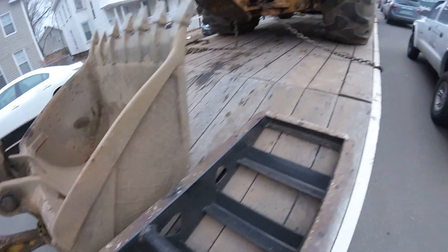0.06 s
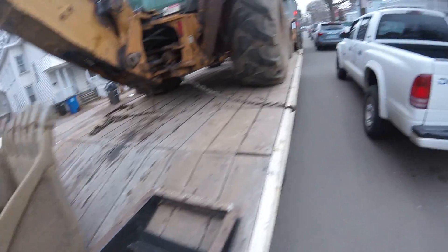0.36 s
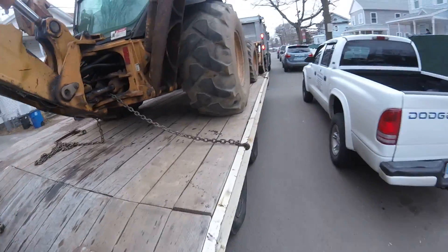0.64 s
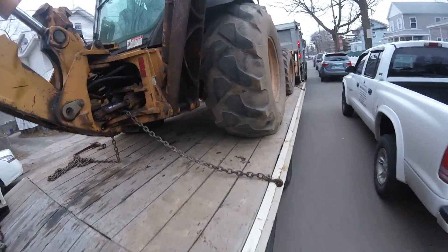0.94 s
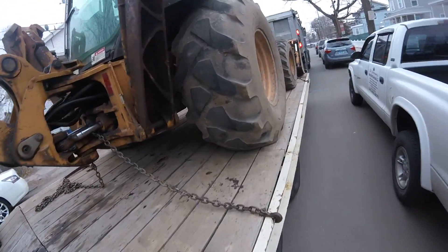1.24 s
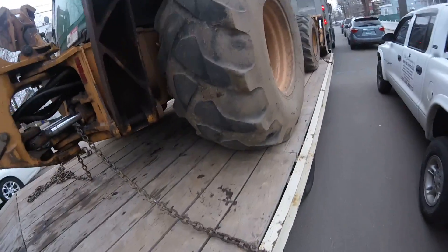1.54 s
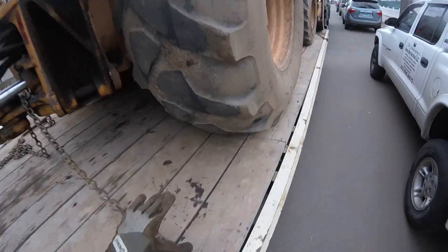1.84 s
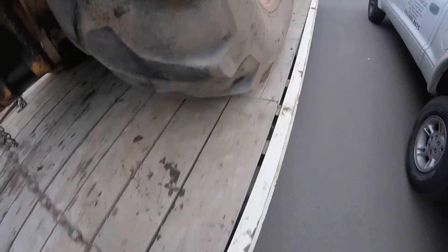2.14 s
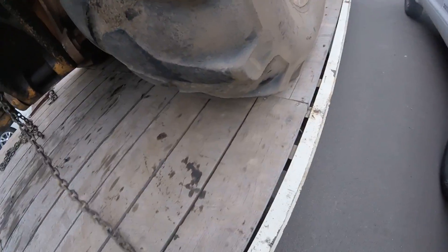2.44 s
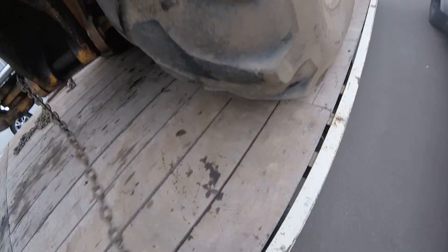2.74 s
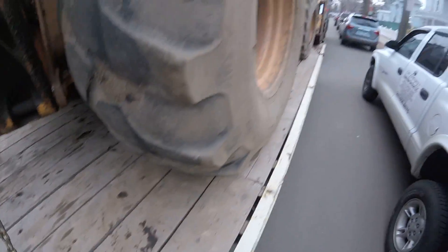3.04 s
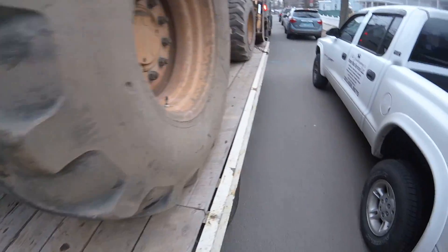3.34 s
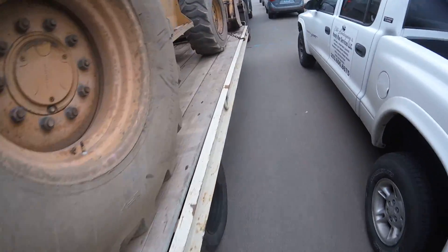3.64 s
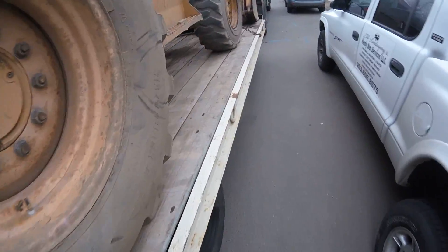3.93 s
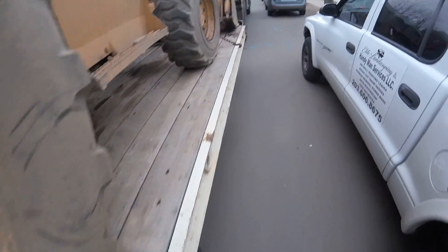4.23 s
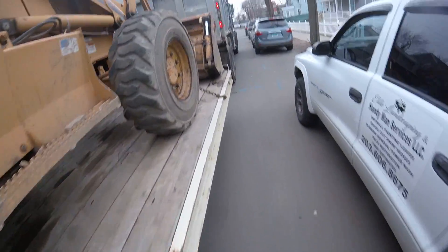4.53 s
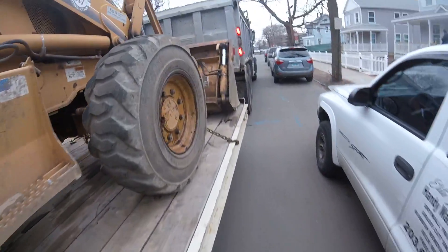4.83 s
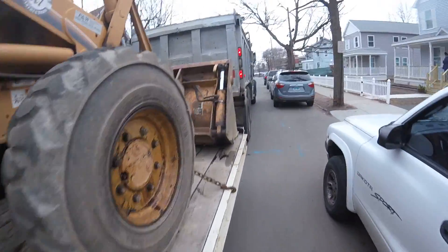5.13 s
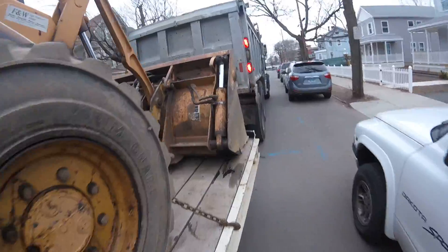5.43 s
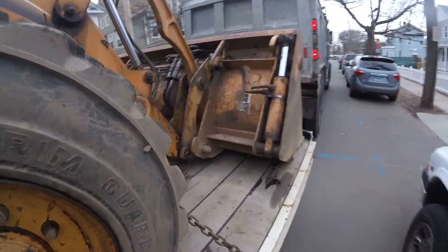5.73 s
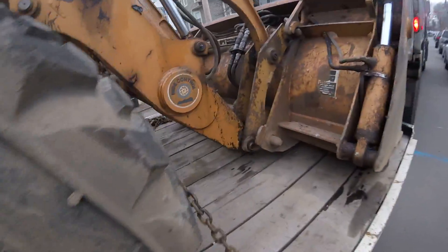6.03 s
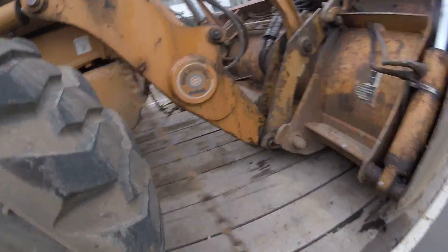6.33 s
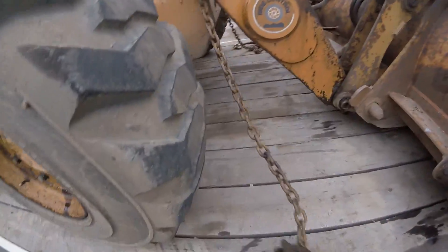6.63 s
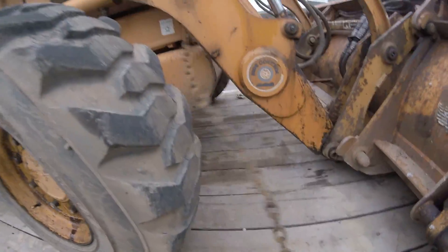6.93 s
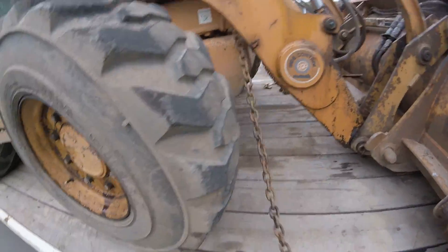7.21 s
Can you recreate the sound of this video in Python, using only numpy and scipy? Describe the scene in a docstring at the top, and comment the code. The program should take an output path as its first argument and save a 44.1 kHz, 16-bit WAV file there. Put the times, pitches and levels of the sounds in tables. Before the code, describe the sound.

A diesel truck idles under wind rumble and street wash as the microphone moves along a flatbed trailer. It opens with a bang and ringing steel, followed by dull wooden thumps, rattling chains and the clink of a chain binder. Midway the load drags loudly across the planks. The engine then throbs more strongly, a close loose fitting clacks more often, clothing swishes softly, and the chains grate and rattle over steel.

```python
"""On a street, walking beside a flatbed trailer with a chained-down loader, behind an idling diesel truck.
The load thumps and drags on the plank deck. Tie-down chains rattle, scrape and set the steel frame
ringing; a binder clinks. A loose fitting clacks close to the microphone. Clothing swishes over engine
throb, wind rumble and street wash. Loud blows duck the gain, and the rumble then swells back."""
import sys
import numpy as np
from scipy import signal
from scipy.fft import rfft, irfft, next_fast_len
from scipy.io import wavfile
from scipy.ndimage import minimum_filter1d

SR = 44100
rng = np.random.default_rng(int(sys.argv[2]) if len(sys.argv) > 2 else 0)


def to_wav(s):
    """Save 16-bit WAV."""
    ch = np.atleast_2d(s).T  # columns
    pcm = np.round(np.clip(ch, -1, 1) * 32767)  # PCM
    wavfile.write(sys.argv[1], SR, pcm.astype(np.int16))


N = 325017

# load hitting the deck: start_s, low_db, mid_db, shudder_db, knock_hz, boom_db
DECK_THUMPS = [(0.095, 7, -3, -5.5, 650, -45), (0.0968, -4, -1.5, -16, 1040, -45),
               (0.117, 17, 8, -20.5, 737, -45), (0.119, -11, -5, -14, 1120, -50),
               (2.095, -13, -16, -12, 985, -39), (2.108, -0.5, 3.5, -4, 945, -24),
               (2.155, -14, -9, -8, 870, -35), (2.561, 1, -4.5, -8, 1090, -38),
               (2.572, 3.5, 4.5, -8, 954, -14.5), (2.66, -17, -14.5, 2, 900, -46),
               (2.751, -9, -7.5, -3, 670, -49), (3.947, -24.5, -14, 2, 1140, -39),
               (3.9688, -7, -3.5, 1, 1230, -35), (3.9899, -2, 7.5, -1.5, 1108, -16),
               (4.0171, 4, 8.5, -6, 1098, -19), (4.044, -0.5, 2, 1, 1350, -22),
               (4.059, -13, -1, -5, 1000, -15), (4.078, 1, 4, -8, 1113, -15.5),
               (4.093, -20, -2, 0.5, 1100, -14), (4.106, 5.5, 4.5, -8, 870, -23),
               (6.18, -3.5, -22, -24, 986, -29), (6.7597, -21, -20, 4, 850, -53),
               (6.8923, -27, -12, -1, 984, -42), (6.8995, -25, -9.5, -9, 696, -35),
               (6.929, -5, -12, -6.5, 490, -27.5), (7.003, -28, -19, -10, 865, -49),
               (7.015, -16, -32, -8, 770, -55)]
# load dragging over the deck: start_s, length_s, peak_db, bass_offset_db
DECK_DRAGS = [(3.975, .165, -2, -7), (6.118, 0.09, -34, 10), (6.328, .2, -26, 6), (6.849, 0.18, -28, 6)]
# plank modes: pitch_hz, level_db, t60_s
DECK_MODES = [(258, -20, 0.076), (300.3, -12, 0.076), (620, -12.5, 0.016), (835, -9, 0.06),
              (1090, -25, 0.018), (1347, -10.5, 0.059)]
# shudder of planks and load: freq_hz, density_db
SHUDDER_SPECTRUM = [(170, -16), (270, -4), (400, -1), (700, -2.5), (1100, -0.5), (1400, -11), (1900, -25.5),
                    (3000, -32), (6000, -41.5)]
# whole deck giving under a blow: freq_hz, density_db
BOOM_SPECTRUM = [(85, -19), (125, 6), (165, -0.5), (205, -8), (280, -8)]

# fitting contacts: start_s, body_db, low_ping_db, mid_ping_db, high_ping_db, body_hz
FITTING_CLACKS = [(1.0213, 3, -24, -8, -19, 1860), (1.0243, -10.5, -25, -25, -34, 1670),
                  (1.0406, -14, -42, -48, -53, 1550), (1.516, -11, -20, -30, -37, 1890),
                  (1.522, -22, -29, -43, -56, 1650), (1.5423, -18, -43, -54, -54, 1450),
                  (1.5586, -20, -16, -26, -35, 1750), (1.5615, -15, -32, -36, -48, 1470),
                  (2.002, -21, -50, -56, -55, 1500), (2.1482, -24, -13, -16, -30, 1860),
                  (2.1772, -17, -11, -12, -11, 1630), (2.1862, -10, -34, -17, -34, 1890),
                  (2.2013, -10, -30, -21, -31, 1790), (2.2098, -24, -22, -20, -29, 2010),
                  (2.241, 5.5, 0, 1.5, -5.5, 1940), (2.25, 9.5, -15, -8.5, -14, 1570),
                  (3.2136, -16, -5, -16, -34, 1640), (3.2173, -6.5, -26, -26, -35, 1400),
                  (3.2205, -27, -28, -23, -31, 1726), (3.2255, -20, -24, -30, -31, 1440),
                  (3.2335, -11, -34, -45, -45, 1550), (3.262, -10.5, -37, -42, -52, 1630),
                  (3.2655, -14, -43, -32, -44, 1530), (3.2721, -13.5, -42, -48, -66, 1530),
                  (3.6294, -17, -9, -11, -18, 1840), (3.6334, -6, -32, -26, -33, 1394),
                  (3.6368, -13.5, -32, -28, -42, 1390), (4.6881, -16.5, -45.5, -54, -60, 1570),
                  (5.116, -27, -34, -25.5, -29, 2430), (5.1247, -13, -6, -35, -32, 1930),
                  (5.131, -6.5, -30, -37, -52, 1500), (5.1622, -9, -36, -18, -30, 1700),
                  (5.1676, 5, -27, -11, -25, 1680), (5.1717, -1.5, -17, -21, -40, 1640),
                  (5.4431, -27, -13, -13, -24, 1990), (5.446, -7.5, -39, -31, -42, 1420),
                  (5.6001, 4, -16, -15, -29, 1830), (5.6056, -3, -29, -20, -35, 1530),
                  (5.612, -5, -28, -24, -30, 1480), (5.6146, -10, -36, -34, -34, 1610),
                  (6.0825, -17, -4, -22, -34, 1750), (6.0863, -14, -15, -29, -46, 1580),
                  (6.1423, -25, -2, -11, -16, 1730), (6.145, -2.5, -26, -24, -43, 1490),
                  (6.149, -7, -23, -20, -24, 1790), (6.153, -20, -12, -23, -32, 1670),
                  (6.3726, -14, -35, -9.5, -21, 2250), (6.378, -8, -24, -9, -23, 1570),
                  (6.3816, -11, -28, -35, -35, 2050), (6.4072, -2, -22, -22, -23, 1560),
                  (6.4134, 0, -1, -9.5, -19, 2000), (6.4186, -5, -14, -24, -34, 1940),
                  (6.483, -9, -20, -16, -23, 1760), (6.488, -9, -21, -32, -32, 1450),
                  (6.4925, -2.5, -19, -17, -22, 1610), (6.538, -18, -0.5, -7, -17, 1640),
                  (6.5402, -3.5, -21, -20, -36, 1560), (6.5448, -22, -8, -13, -22, 1870),
                  (6.549, -8, -19, -21, -26, 1698), (7.2685, -22, -28, -32, -33.5, 1988)]
# fitting modes: pitch_hz, level_db, t60_s
FITTING_MODES = [(692, -23, 0.0053), (1272, -13.5, 0.014), (1536, -22.5, 0.077), (2140, -22.5, 0.073),
                 (2314, -0.5, 0.0053), (2510, -13.5, 0.014), (3480, -14, 0.0075), (4450, -2.5, 0.0058),
                 (5650, -5, 0.013), (6850, -0.5, 0.007), (7820, -7.5, 0.0041), (9210, 1, 0.0053),
                 (12300, -5, 0.0055), (13800, -15, .003)]
# crack and buzz of a contact: freq_hz, density_db
CRACK_SPECTRUM = [(2500, 4.5), (6000, -0.5), (10000, -5.5), (16000, -18.5)]
BUZZ_SPECTRUM = [(250, 18.5), (900, 8.5), (1500, 14), (2300, 6.5), (3200, -4), (7000, -15.5),
                 (14000, -43)]

# chain jerks: start_s, clank_db, jingle_db, ping_db
CHAIN_JERKS = [(0.001, -21.5, -29, -52), (0.118, -3.5, -17, -25), (0.148, -9, -14, -22),
               (0.34, -30, -56, -66), (2.099, -21, -40, -47), (2.111, -18.5, -31, -57.5),
               (2.658, -24.5, -44, -84), (2.734, -26.5, -45, -80), (2.752, -25.5, -38, -76),
               (3.937, -22, -56, -50), (3.9695, -19, -68, -56), (4.017, -14, -65, -40),
               (4.043, -21, -55, -33), (4.058, -24, -52, -25.5), (4.094, -13.5, -54, -36),
               (4.12, -27, -43, -41), (6.452, -21, -33, -52), (6.47, -17.5, -32, -41),
               (6.562, -28.5, -36, -48), (6.724, -34, -48, -32.5), (6.7336, -29.5, -46, -51),
               (6.759, -29, -36, -71), (6.853, -28.5, -42, -76), (6.892, -29.5, -40.5, -69),
               (6.925, -32.5, -42, -52), (6.982, -41, -45, -61), (7.063, -27, -21, -27.5),
               (7.0714, -21, -37, -50), (7.153, -38, -45, -52)]
# chain shake per thump, relative to its mid_db: clank_db, jingle_db, ping_db
THUMP_SHAKE_DB = (-32.5, -57.5, -67)
# link modes, and the thin ring of a single link: pitch_hz, level_db, t60_s
LINK_MODES = [(1625, -15.5, 0.1), (2562, -10, 0.06), (3530, -7, 0.05), (4300, -11.5, 0.031),
              (5390, -3, 0.033), (6940, -1, 0.035), (8240, -11.5, 0.025), (9340, -3, 0.04)]
LINK_PING_MODES = [(13700, -5.5, .19), (14600, -12, .11)]
# low, high and top bands of a rattle: freq_hz, density_db
CLANK_SPECTRUM = [(800, 18), (1500, 13.5), (2000, 3), (2750, -1.5), (3400, -3.5), (4300, -12),
                  (5500, -31.5), (8000, -29.5)]
JINGLE_SPECTRUM = [(3000, 9.5), (4500, 4.5), (5500, -2.5), (6100, 3), (6800, 8.5), (7800, -5), (9500, -2.5),
                   (12000, -25.5)]
PING_SPECTRUM = [(10500, -10.5), (12500, -12.5), (13400, 3), (14000, -5.5), (14700, -0.5), (15400, -12.5)]

# chain sliding over a steel edge: centre_s, half_width_s, grating_db, sizzle_db
CHAIN_SCRAPES = [(2.184, 0.052, -35, -44), (2.672, .012, -40, -54), (2.76, 0.019, -34, -51),
                 (3.98, 0.023, -27, -51), (4.117, .025, -34, -53), (6.37, 0.03, -43, -47),
                 (6.428, 0.016, -31, -55), (6.481, 0.041, -28.5, -40.5), (6.578, 0.036, -38, -44),
                 (6.74, 0.0075, -50, -42), (6.857, 0.011, -38, -42), (7.072, 0.009, -44, -50)]
# modes rung by snagging links: pitch_hz, gain_db, t60_s
GRATE_MODES = [(1130, -7.5, .012), (1440, 2, .014), (1630, 1, 0.014), (2000, -3, .01), (2420, -2, .009),
               (2950, -7, .008), (3500, -10, 0.0076), (4200, -14.5, .006)]
# sizzle of a scrape: freq_hz, density_db
SIZZLE_SPECTRUM = [(2500, 6), (4500, 8.5), (7000, 2), (10000, -7.5), (13000, -24.5)]

# binder hitting the deck: start_s, level_db
BINDER_HITS = [(2.658, -38), (2.751, -23), (7.066, -35)]
# binder modes: pitch_hz, level_db, t60_s
BINDER_MODES = [(2320, -17, 0.19), (2530, -4, 0.054), (2660, 3, 0.062), (2890, -2, 0.061),
                (3130, -3.5, 0.087), (3620, -5.5, 0.056), (5170, -14, .06), (5600, -15, 0.044),
                (6330, -11, 0.045)]

# blows reaching the frame: start_s, level_db
FRAME_HITS = [(.001, 14), (0.135, 19.5)]
# frame modes: pitch_hz, t60_s, first_hit_db, second_hit_db
FRAME_MODES = [(310, 0.8, -71, -40.5), (411, 4.2, -44.5, -66.5), (718, 0.49, -43, -43),
               (766, 0.26, -51, -29), (882, 0.26, -22.5, -30), (903, 1.6, -50, -44), (1280, 0.55, -48, -44),
               (1383, 0.45, -38, -34), (1413, 0.22, -36, -21), (1496, 0.56, -34.5, -39),
               (1526, 0.68, -36, -40), (1630, 0.53, -43, -46), (1980, 0.38, -50, -43),
               (2270, 0.7, -61, -49.5), (2560, 0.51, -57, -47), (2740, 0.33, -51, -50),
               (2820, 0.29, -51, -58), (3115, 0.46, -43.5, -43), (3181, 0.33, -41, -35),
               (3360, 0.69, -52, -52), (3440, 0.33, -48, -38.5), (3590, 0.32, -48, -40),
               (3800, 0.31, -48, -42), (4140, 0.4, -47, -55), (4850, 0.22, -52, -43),
               (5400, 0.21, -49, -43), (6650, 0.3, -59, -46), (6840, 0.24, -64, -37), (8550, .18, -60, -58),
               (9200, 0.34, -65, -54), (10550, 0.24, -76, -48)]
# crowd of weak frame modes: freq_hz, density_db
SHIMMER_SPECTRUM = [(250, 5), (800, -5), (1500, 4), (2100, -2), (3400, -2), (5000, -1.5), (7000, -5.5),
                    (11000, -21)]

# clothing swishes: centre_s, half_width_s, level_db
CLOTH_SWISHES = [(0.877, 0.03, -52), (1.368, 0.039, -50), (1.854, 0.018, -55.5), (3.495, 0.18, -58),
                 (4.545, 0.03, -47.5), (5.023, 0.038, -42), (5.445, 0.036, -47.5), (5.915, 0.025, -48.5)]
# cloth friction: freq_hz, density_db
CLOTH_SPECTRUM = [(1200, 3.5), (3300, 13.5), (4800, 4), (6000, 6), (8000, -2), (12000, -1.5), (15000, -25)]

# background as the truck draws nearer: time_s, firing_db, rumble_db, street_db
BACKGROUND_LEVELS = [(0.0, -27.5, -30.5, -40), (1.3, -29, -26.5, -40.5), (2.9, -27.5, -28.5, -43),
                     (3.7, -32, -24.5, -39), (4.5, -21, -23.5, -37.5), (5.8, -18, -24.5, -39),
                     (7.37, -20.5, -27.5, -35.5)]
# exhaust overtones: crank_multiple, level_db
EXHAUST_ORDERS = [(4, 6), (4.5, 0.5), (6, 2), (7, -9), (9, 2), (12, 1), (13, -5.5), (15.5, -8.5), (21, -13)]
# wind on the microphone: freq_hz, density_db
WIND_SPECTRUM = [(12, -10), (25, 3.5), (47, 3), (65, -3.5), (85, 3), (112, -6), (170, -13), (260, -15),
                 (500, -49.5)]
# engine and street wash: freq_hz, density_db
STREET_SPECTRUM = [(120, -9.5), (300, 2.5), (410, 3.5), (560, 0.5), (900, 4), (1300, -4.5), (1900, -20),
                   (2600, -23), (3700, -21), (4800, -35), (6500, -36.5), (10000, -42), (15000, -60.5)]


def deck(lowpass_hz=2800):
    """A dull knock, then planks and load shudder on, longest in the bass; wood swallows the treble."""
    blows = list(DECK_THUMPS) + drag_slips()
    start_s, low_db, mid_db, shudder_db, knock_hz, boom_db = np.transpose(blows)
    knock = ring(start_s, knock_hz, mid_db, t60_s=0.048, contact_s=0.00026)
    knock += strike(blows, [400, 950], DECK_MODES, contact_s=0.0016, scatter_db=-1.5, detune=0.088)
    tail = decay(start_s, low_db + shudder_db - 8, t60_s=0.46) * noise(SHUDDER_SPECTRUM, high_hz=790)
    tail += decay(start_s, mid_db + shudder_db - 9, t60_s=0.26) * noise(SHUDDER_SPECTRUM, low_hz=770)
    tail += decay(start_s, boom_db, t60_s=0.36) * noise(BOOM_SPECTRUM)
    return signal.sosfilt(signal.butter(2, lowpass_hz, fs=SR, output="sos"), knock + tail)


def drag_slips(count=12, centre_hz=1047, spread=0.214, swell_db=2, shudder_db=1.5, boom_offset_db=-24.5):
    """Stick-slip: each drag is an uneven run of small thumps that swells and fades."""
    thumps = []
    for start_s, length_s, peak_db, bass_offset_db in DECK_DRAGS:
        for k, (late, shift) in enumerate(rng.uniform(-0.999, 1, (count, 2))):
            progress = (k + 0.5 + 0.5 * late) / count
            mid_db = peak_db - swell_db * (2 * progress - 1) ** 2
            knock_hz = centre_hz * (1 + spread * shift)
            thumps.append((start_s + length_s * progress, mid_db + bass_offset_db, mid_db,
                           shudder_db, knock_hz, mid_db + boom_offset_db))
    return thumps


def fitting(neutral_hz=1670, lean_db_per_octave=16):
    """Hard, short contacts of a loose fitting: body note, ringing modes, crack and faint buzz."""
    start_s, body_db, low_db, mid_db, high_db, body_hz = np.transpose(FITTING_CLACKS)
    knock = ring(start_s, body_hz, body_db, t60_s=0.01, contact_s=0.00066)
    # low contacts favour the lower ringing mode, high ones the upper
    lean_db = lean_db_per_octave * np.log2(body_hz / neutral_hz)
    contacts = np.column_stack([start_s, body_db - lean_db, body_db + lean_db, low_db, mid_db, high_db])
    pings = strike(contacts, [1560, 2140, 3500, 5700, 9000], FITTING_MODES,
                   contact_s=0.0005, scatter_db=3, detune=0.018)
    crack_db = np.maximum(mid_db, high_db) - 17
    crack = decay(start_s, crack_db, t60_s=0.027, rise_s=0.0003) * noise(CRACK_SPECTRUM)
    buzz = decay(start_s, body_db - 28, t60_s=0.11) * noise(BUZZ_SPECTRUM)
    return knock + pings + crack + buzz


def chains(tick_t60_s=0.0061, grain_db=4):
    """Jerks and thumps shake the chains: links tick and ring, a grainy spray of modes dies away."""
    shakes = [(start_s, *np.add(mid_db, THUMP_SHAKE_DB)) for start_s, _, mid_db, *_ in DECK_THUMPS]
    jerks = list(CHAIN_JERKS) + shakes
    start_s, clank_db, jingle_db, ping_db = np.transpose(jerks)
    contacts = rebounds(jerks, count=3, gap_s=0.011, loss_db=4.5)
    tick_s, tick_clank_db, tick_jingle_db, _ = contacts.T
    steel = rms_one(from_db(-4) * white() + partials(count=420))
    steel *= from_db(grain_db * (drift(330) - 1))
    clank = np.hypot(decay(start_s, clank_db, t60_s=0.23, rise_s=0.002),
                     decay(tick_s, tick_clank_db + 2, tick_t60_s))
    jingle = np.hypot(decay(start_s, jingle_db - 2, t60_s=0.074, rise_s=0.0073),
                      decay(tick_s, tick_jingle_db + 2, tick_t60_s))
    spray = clank * noise(CLANK_SPECTRUM, source=steel) + jingle * noise(JINGLE_SPECTRUM, source=steel)
    spray += decay(start_s, ping_db - 3, t60_s=0.05, rise_s=0.0058) * noise(PING_SPECTRUM, source=steel)
    pings = strike(np.column_stack([start_s, ping_db]), [14000], LINK_PING_MODES,
                   contact_s=0.0024, scatter_db=12, detune=0.003)
    links = strike(contacts, [3200, 6000, 13500], LINK_MODES,
                   contact_s=0.0004, scatter_db=11, detune=0.063)
    return spray + pings + from_db(-5) * links


def rebounds(hits, count, gap_s, loss_db):
    """Loose steel hits again after uneven gaps, weaker each time."""
    hits = np.array(hits)
    delay_s = np.cumsum(gap_s * rng.uniform(0.3, 1.7, (len(hits), count)), axis=1)
    later = [np.column_stack([hits[:, 0] + delay_s[:, k], hits[:, 1:] - loss_db * (k + 1)])
             for k in range(count)]
    return np.vstack([hits, *later])


def chain_scrapes(snags_per_s=1200, lowpass_hz=3800, grain_db=4):
    """Links grate over an edge: dense, blunt snags ring short modes under a gritty sizzle."""
    grating, sizzle = 0, 0
    for centre_s, half_width_s, grating_db, sizzle_db in CHAIN_SCRAPES:
        envelope = swell(centre_s, half_width_s)
        grating += from_db(grating_db) * envelope
        sizzle += from_db(sizzle_db) * envelope
    snags = rng.random(N) < snags_per_s / SR
    snags = snags * from_db(-np.minimum(rng.exponential(1, N), 3))
    modes = 0
    for pitch_hz, gain_db, t60_s in GRATE_MODES:
        radius = from_db(-60 / (t60_s * SR))
        resonator = [1, -2 * radius * np.cos(2 * np.pi * pitch_hz / SR), radius ** 2]
        modes += from_db(gain_db) * signal.lfilter([1, 0, -1], resonator, snags * white() + 1e-18)
    modes = signal.sosfilt(signal.butter(4, lowpass_hz, fs=SR, output="sos"), modes)
    grit = rms_one(white() * from_db(grain_db * drift(500)))
    return grating * rms_one(modes) + sizzle * noise(SIZZLE_SPECTRUM, source=grit)


def binder():
    """A solid steel binder knocks on the deck: a short, bright clink."""
    return strike(BINDER_HITS, [3000], BINDER_MODES, contact_s=0.0006, scatter_db=2, detune=0.012)


def frame(shimmer_db=-39, jangle_db=2):
    """The steel frame rings long: clear modes set by where it is hit, in a shimmer of weak ones."""
    start_s, hit_db = np.transpose(FRAME_HITS)
    clear = sum(ring(start_s, pitch_hz, hit_db + mode_db, t60_s, contact_s=0.00018)
                for pitch_hz, t60_s, *mode_db in FRAME_MODES)
    crowd = rms_one(partials(count=420) + from_db(-6) * white())
    crowd *= from_db(jangle_db * drift(120))
    low = noise(SHIMMER_SPECTRUM, high_hz=3850, source=crowd)
    high = noise(SHIMMER_SPECTRUM, low_hz=1300, source=crowd)
    level_db = hit_db + shimmer_db
    return clear + low * decay(start_s, level_db, t60_s=0.65) + high * decay(start_s, level_db, t60_s=0.4)


def clothing():
    """Cloth slides on cloth in soft swells."""
    envelope = sum(from_db(level_db) * swell(centre_s, half_width_s)
                   for centre_s, half_width_s, level_db in CLOTH_SWISHES)
    return envelope * noise(CLOTH_SPECTRUM)


def truck(firing_db, rumble_db, crank_hz=10.9, throb_period_s=0.4, throb_depth=0.42, trough_s=6.265):
    """Idling diesel: a throbbing firing tone, plus crank overtones from uneven cylinders."""
    crank_rad = 2 * np.pi * np.cumsum(crank_hz * (1 + 0.00462 * drift(4))) / SR
    overtones = 0
    for multiple, level_db in EXHAUST_ORDERS:
        gain = from_db(level_db + 1.5 * drift(8.3))
        overtones += gain * np.sin(multiple * crank_rad + rng.uniform(0, 2 * np.pi))
    throb = 1 - throb_depth * np.cos(2 * np.pi * (np.arange(N) / SR - trough_s) / throb_period_s)
    firing = throb * np.sin(3 * crank_rad)   # three firings per turn
    return np.sqrt(2) * (from_db(firing_db) * firing + from_db(rumble_db - 12.5) * overtones)


def wind(rumble_db):
    """Lumpy wind rumble on the microphone."""
    return from_db(rumble_db - 2 + 1.1 * drift(4.9)) * noise(WIND_SPECTRUM)


def street(street_db):
    """Flickering wash of engine and street noise."""
    return from_db(street_db + 3 + 1.1 * drift(25)) * noise(STREET_SPECTRUM)


def strike(blows, bands_hz, modes, contact_s, scatter_db, detune):
    """Blows (start_s, one level_db per band) ring modes, each with random detuning and strength."""
    blows, out = np.array(blows), 0
    bands_db = blows[:, 1:len(bands_hz) + 1]
    for k, (mode_hz, mode_db, t60_s) in enumerate(modes):
        force_db = np.array([np.interp(np.log(mode_hz), np.log(bands_hz), row) for row in bands_db])
        shift, favour = rng.uniform(-0.98, 1, (len(blows), 2)).T
        level_db = force_db + mode_db + scatter_db * favour
        out += (-1) ** k * ring(blows[:, 0], mode_hz * (1 + detune * shift), level_db, t60_s, contact_s)
    return out


def ring(start_s, pitch_hz, level_db, t60_s, contact_s):
    """One decaying sine per blow; longer contact softens the onset."""
    out = np.zeros(N)
    t = np.arange(int(1.5 * t60_s * SR)) / SR
    envelope = from_db(-60 * t / t60_s) * (1 - np.exp(-(t / contact_s) ** 2))
    for at_s, hz, db in np.broadcast(start_s, pitch_hz, level_db):
        first = int(np.clip(at_s * SR, 0, N - 1))
        tone = from_db(db) * envelope * np.sin(2 * np.pi * hz * t)
        out[first:first + len(t)] += tone[:N - first]
    return out


def decay(start_s, level_db, t60_s, rise_s=0.000094):
    """Amplitude envelope: each blow feeds in energy over rise_s, which then leaks away."""
    energy = np.bincount(np.clip(start_s * SR, 0, N - 1).astype(int), from_db(level_db) ** 2, N)
    retained = from_db(-120 / (t60_s * SR))
    lag = np.exp(-1 / (rise_s * SR))
    return np.sqrt(signal.lfilter([1 - lag], np.convolve([1, -retained], [1, -lag]), energy + 1e-18))


def swell(centre_s, half_width_s):
    """Gaussian envelope, peak 1."""
    return np.exp(-((np.arange(N) / SR - centre_s) / half_width_s) ** 2)


def noise(spectrum, low_hz=10, high_hz=SR / 2, source=None):
    """Source (default white) shaped by a unit-power spectrum, then band-limited."""
    size = next_fast_len(N)
    hz = np.arange(size // 2 + 1) * SR / size + 1e-3
    freq_hz, density_db = np.transpose(spectrum)
    colour_db = np.interp(np.log(hz), np.log(freq_hz), density_db, left=-np.inf, right=-np.inf)
    band = (hz >= low_hz) & (hz < high_hz)
    bins = rfft(white() if source is None else source, size)
    return irfft(bins * rms_one(from_db(colour_db)) * band, size)[:N]


def partials(count):
    """Steady modes of random pitch and strength; unit power."""
    bins = np.zeros(N // 2 + 1, complex)
    chosen = rng.integers(1, N // 2, count)
    bins[chosen] = rng.standard_normal(count) + 1j * rng.standard_normal(count)
    return rms_one(irfft(bins, N))


def drift(rate_hz):
    """Random line with rate_hz knots per second; unit power."""
    knots = rng.standard_normal(4096)
    return rms_one(np.interp(np.arange(N) / SR * rate_hz, np.arange(len(knots)), knots))


def white():
    """White noise."""
    return rng.standard_normal(N)


def rms_one(x):
    """Scale to unit power."""
    return x / np.sqrt(np.mean(x ** 2) + 1e-20)


def from_db(db):
    """Decibels to gain."""
    return 10 ** (np.asarray(db) / 20)


def gain_control(x, ceiling_db=-4.5, recovery_db_per_s=13.5, start_duck_db=10.5, attack_s=0.0012):
    """Gain starts ducked, drops on peaks over the ceiling and recovers at a steady rate."""
    over_db = np.maximum(20 * np.log10(np.abs(x[0]) + 1e-9) - ceiling_db, 0)
    over_db = -minimum_filter1d(-over_db, size=150)   # brief look-ahead
    recovered_db = recovery_db_per_s * np.arange(N) / SR
    duck_db = np.maximum.accumulate(np.maximum(over_db + recovered_db, start_duck_db)) - recovered_db
    lag = np.exp(-1 / (attack_s * SR))
    smooth_db, _ = signal.lfilter([1 - lag], [1, -lag], duck_db, zi=[lag * start_duck_db])
    return x * from_db(-smooth_db)


def scene():
    """All sources at one microphone in the open air."""
    time_s, *curves_db = np.transpose(BACKGROUND_LEVELS)
    firing_db, rumble_db, street_db = [np.interp(np.arange(N) / SR, time_s, db) for db in curves_db]
    background = truck(firing_db, rumble_db) + wind(rumble_db) + street(street_db)
    trailer = fitting() + deck() + chains() + chain_scrapes() + binder() + frame()
    return (trailer + clothing() + background)[None]


def record(dry, clip_level=0.68, stopband_hz=16600):
    """Gain control, soft clip, steep low-pass."""
    ducked = gain_control(dry)
    rounded = ducked / (1 + (ducked / clip_level) ** 6) ** (1 / 6)
    return signal.sosfilt(signal.cheby2(14, 60, stopband_hz, fs=SR, output="sos"), rounded)


dry = scene()
out = record(dry)
to_wav(out)
```